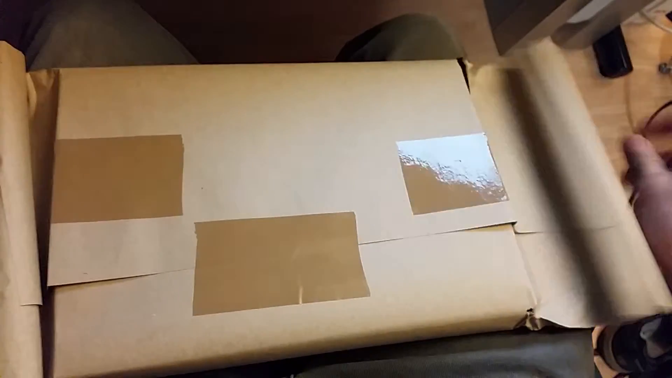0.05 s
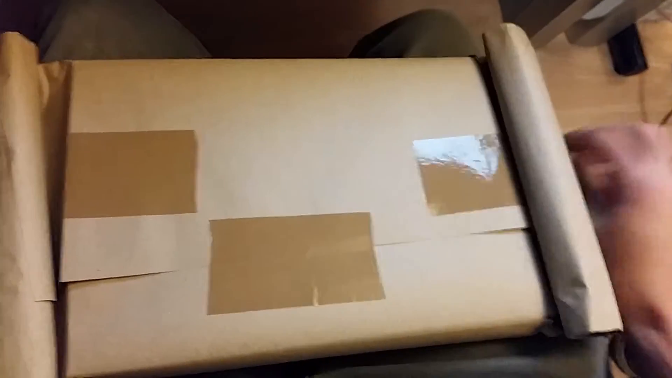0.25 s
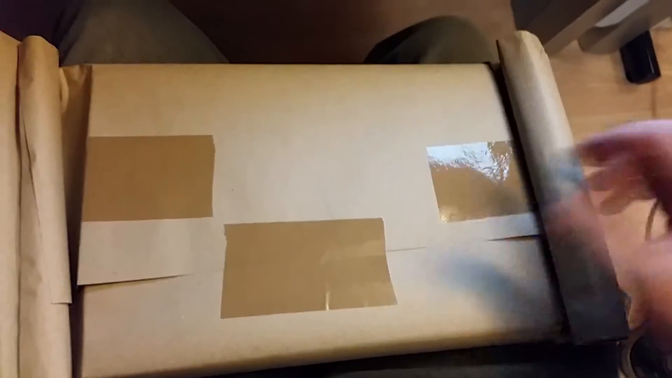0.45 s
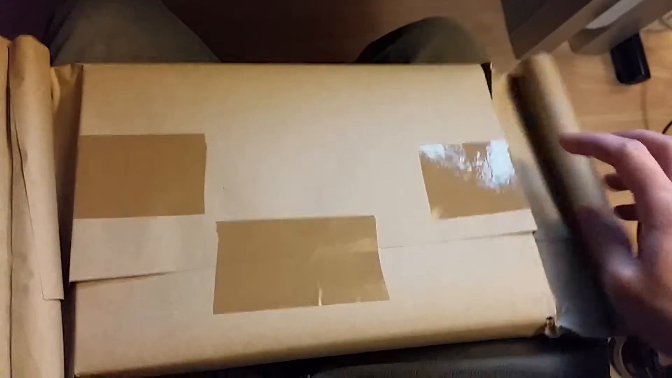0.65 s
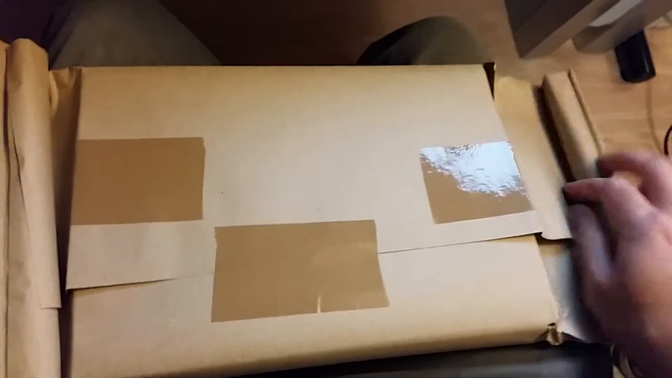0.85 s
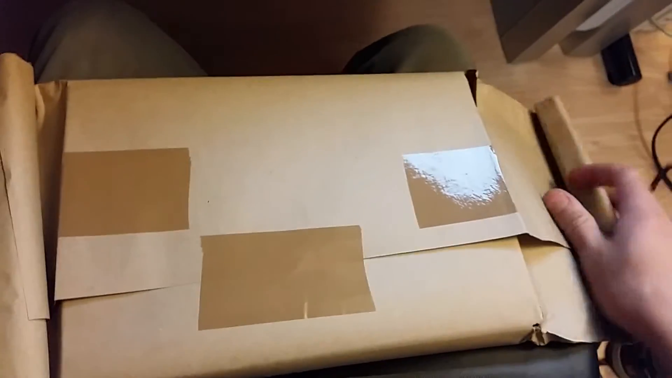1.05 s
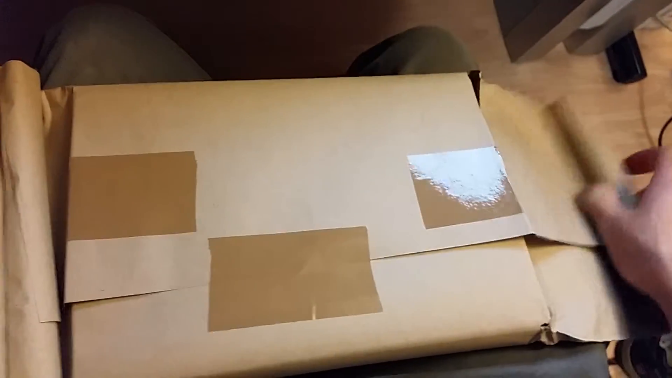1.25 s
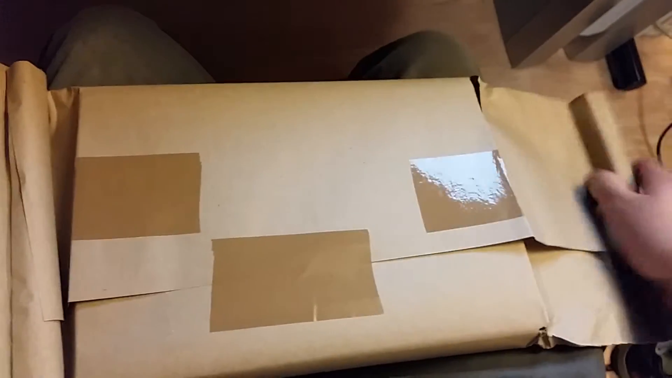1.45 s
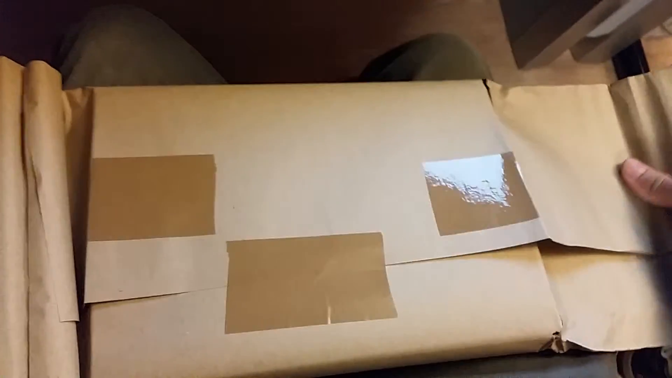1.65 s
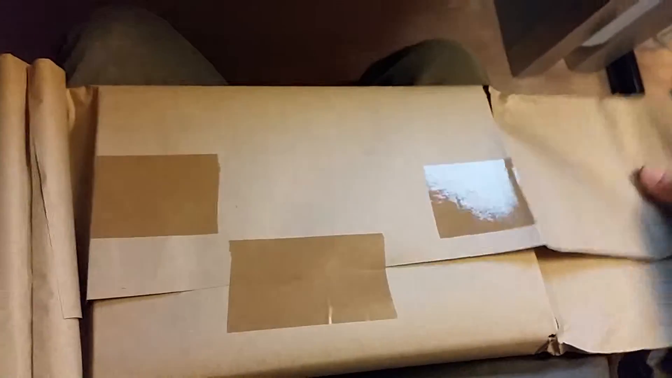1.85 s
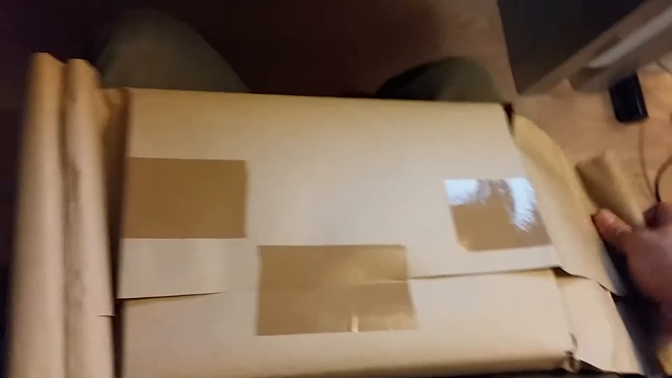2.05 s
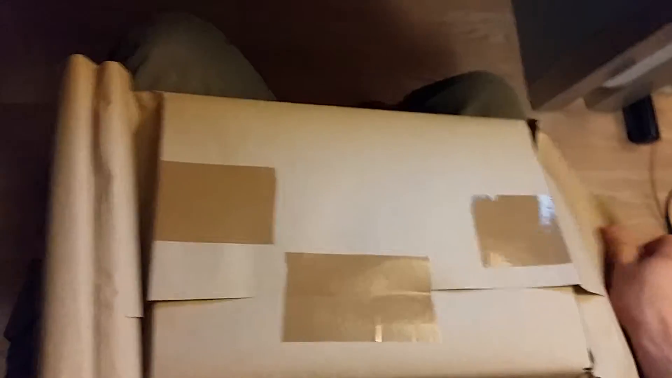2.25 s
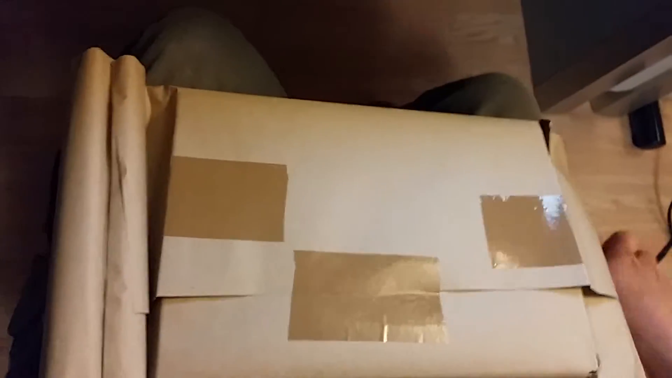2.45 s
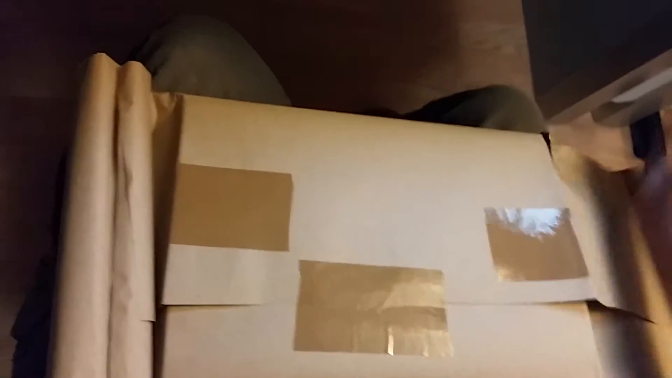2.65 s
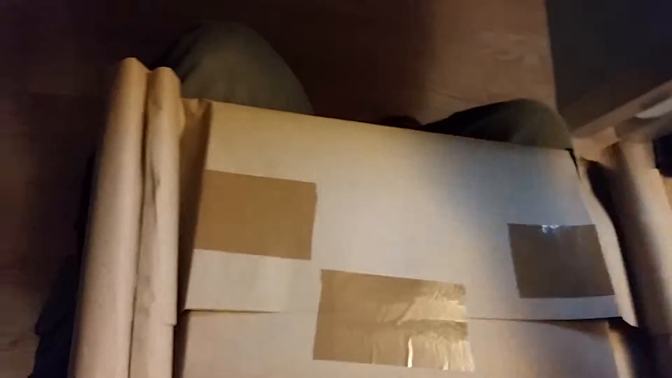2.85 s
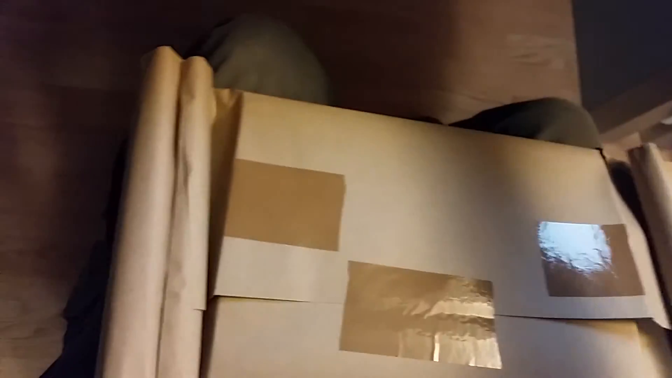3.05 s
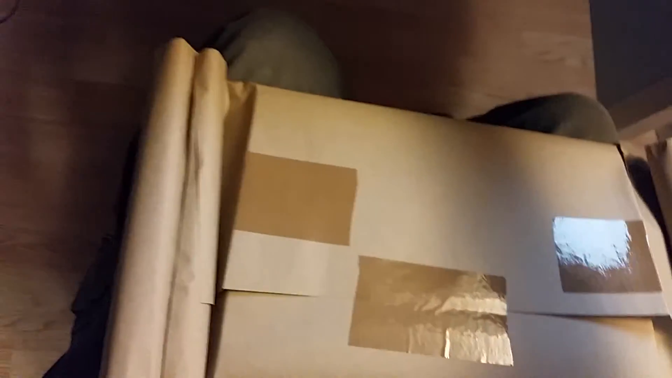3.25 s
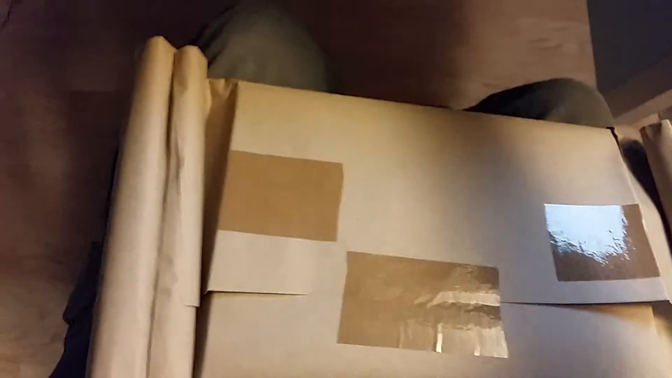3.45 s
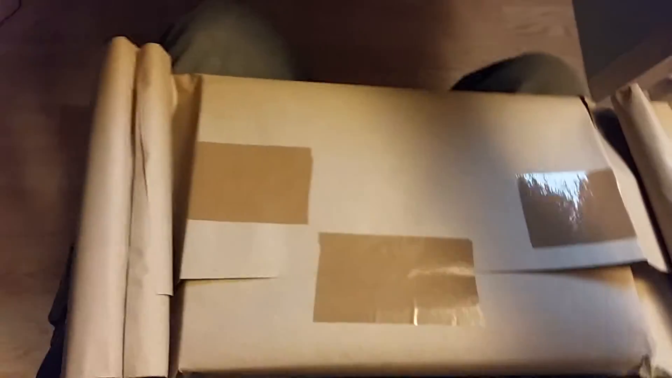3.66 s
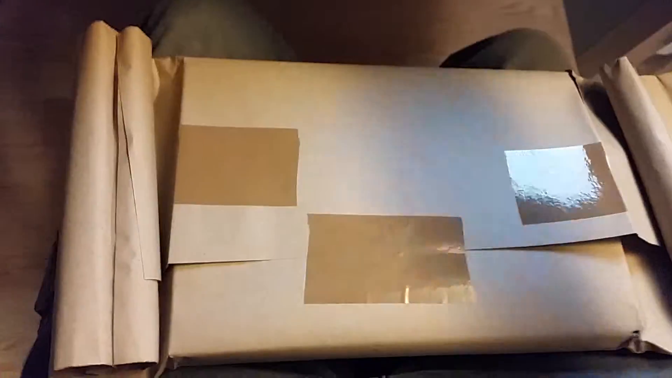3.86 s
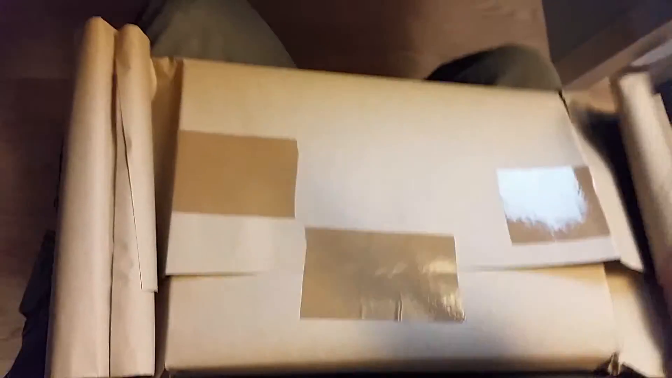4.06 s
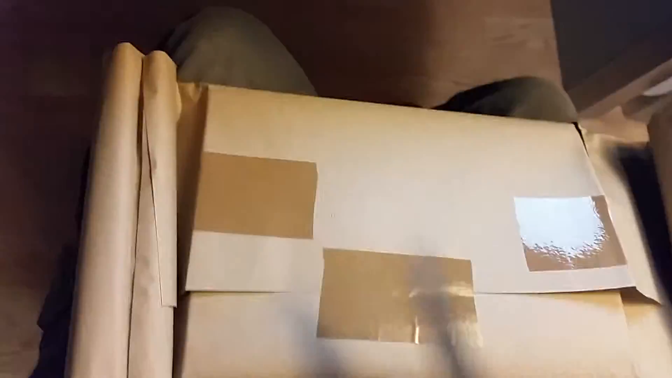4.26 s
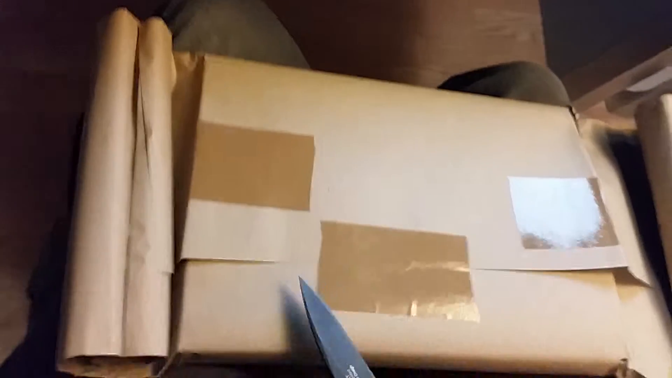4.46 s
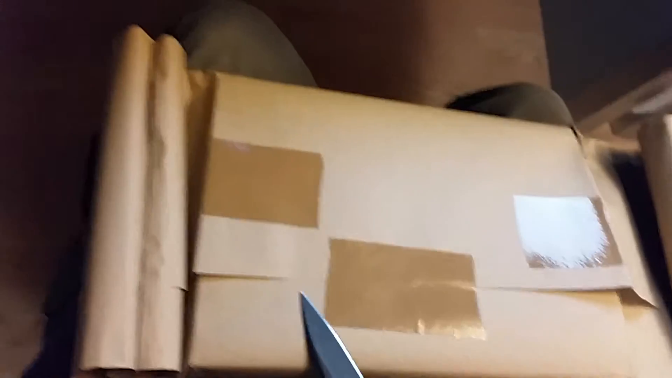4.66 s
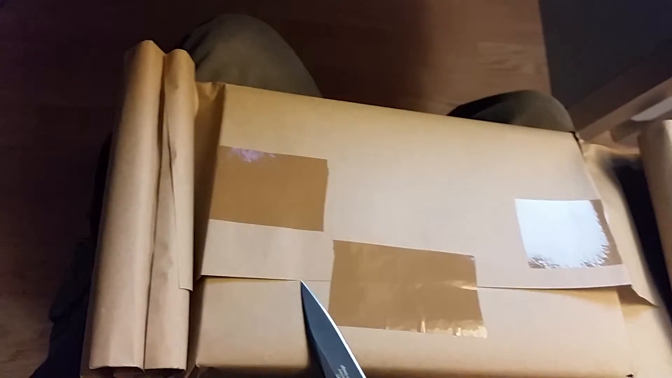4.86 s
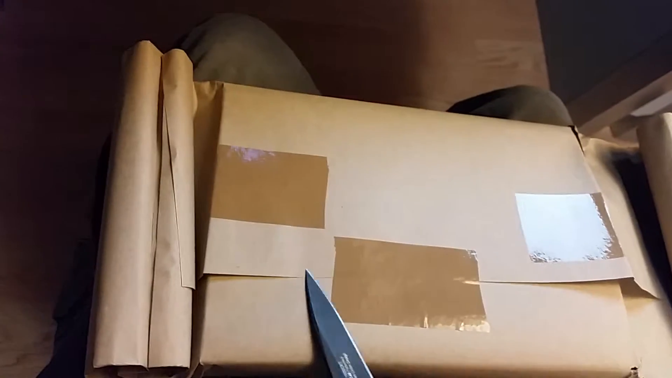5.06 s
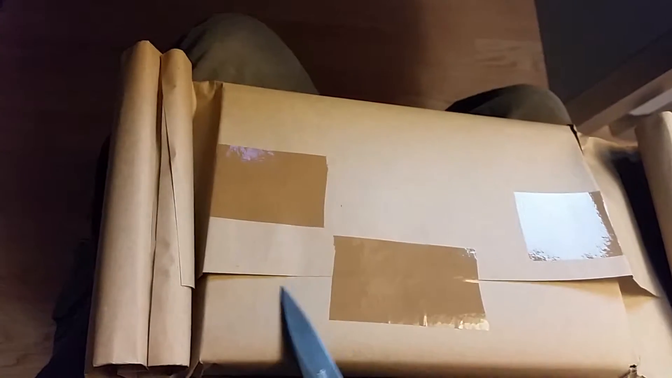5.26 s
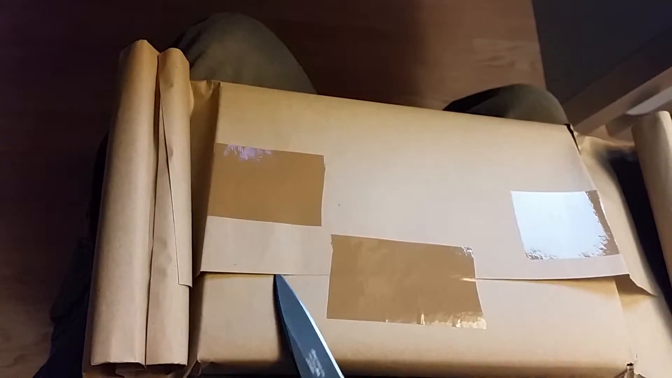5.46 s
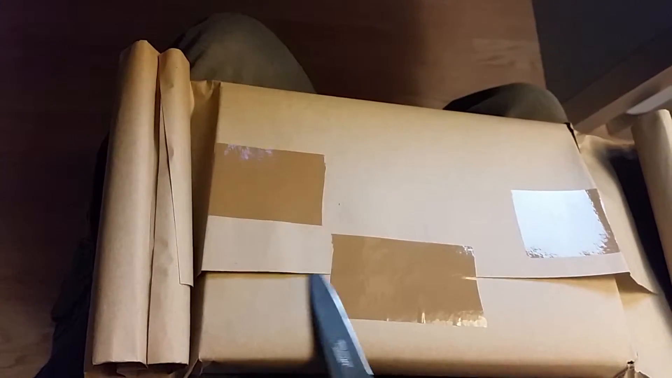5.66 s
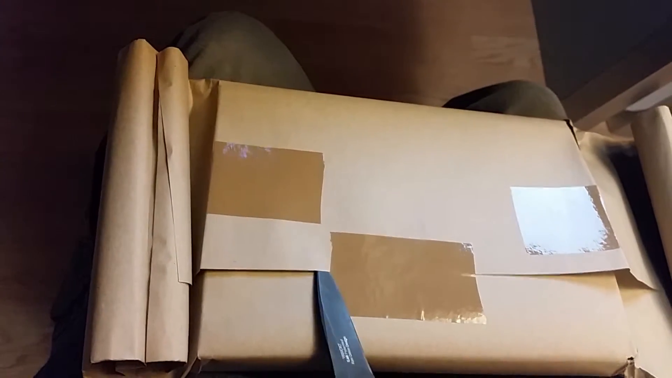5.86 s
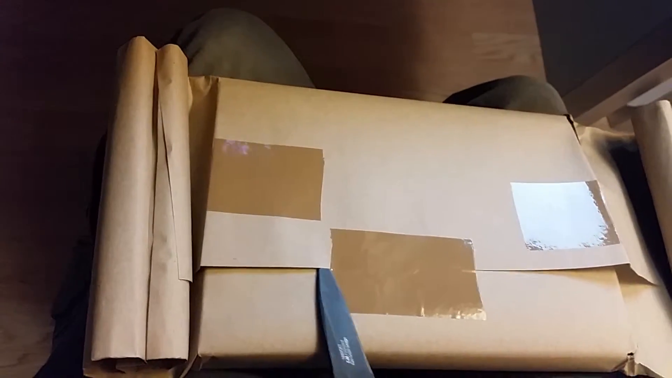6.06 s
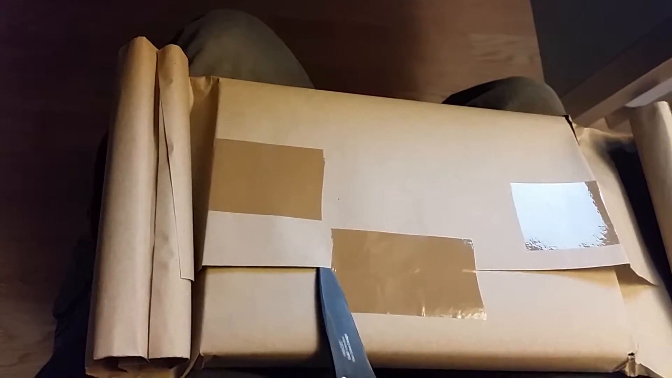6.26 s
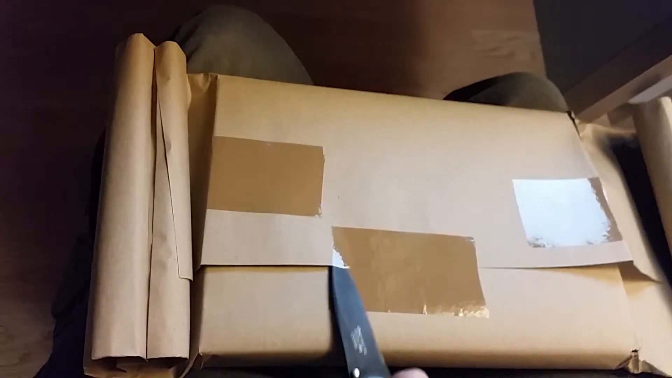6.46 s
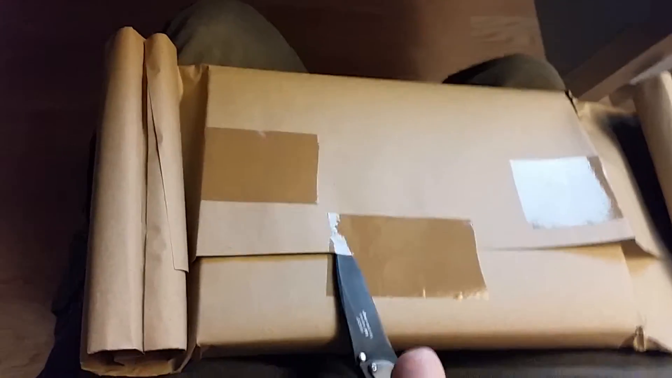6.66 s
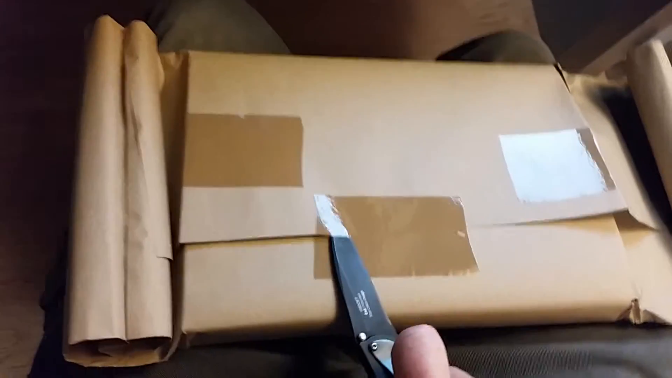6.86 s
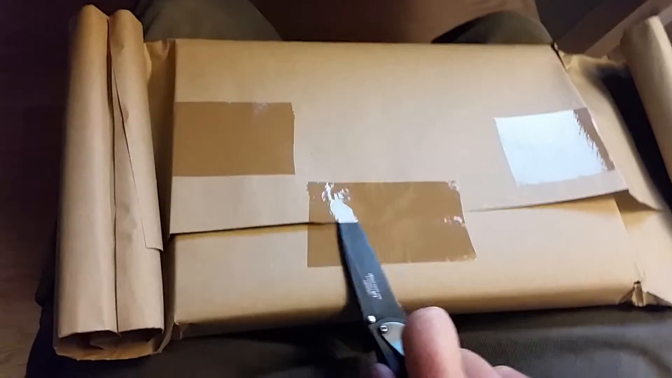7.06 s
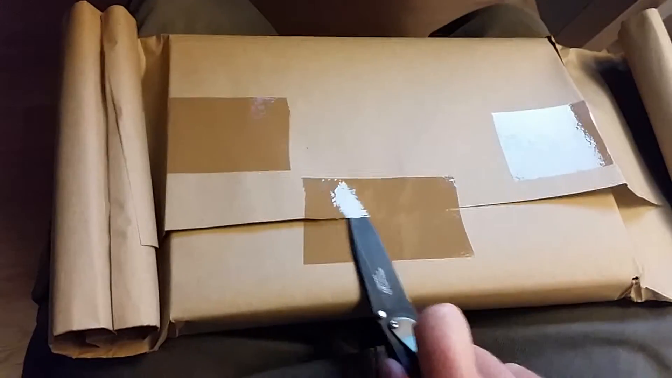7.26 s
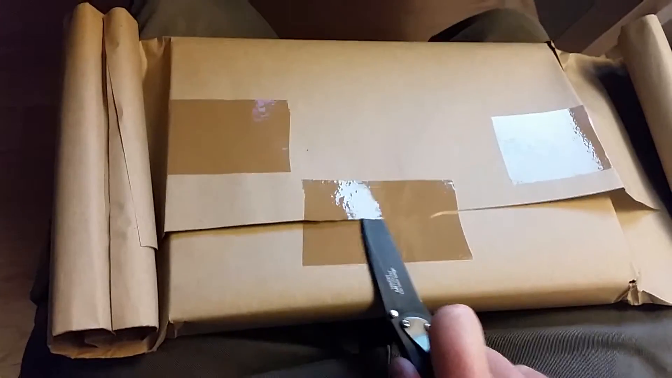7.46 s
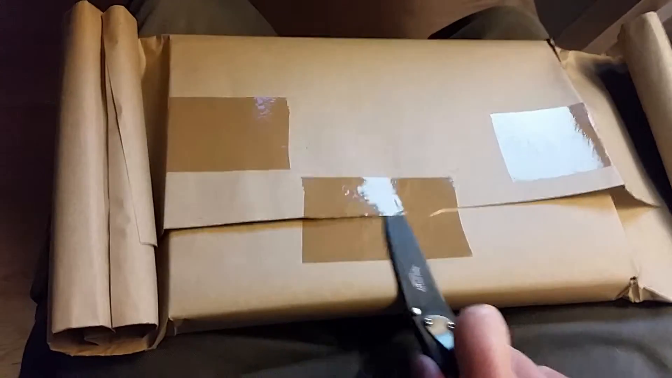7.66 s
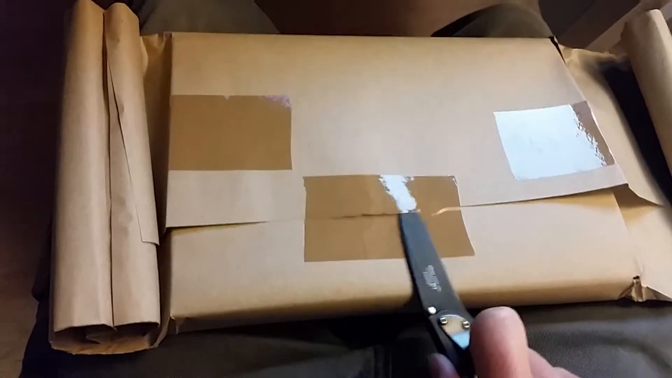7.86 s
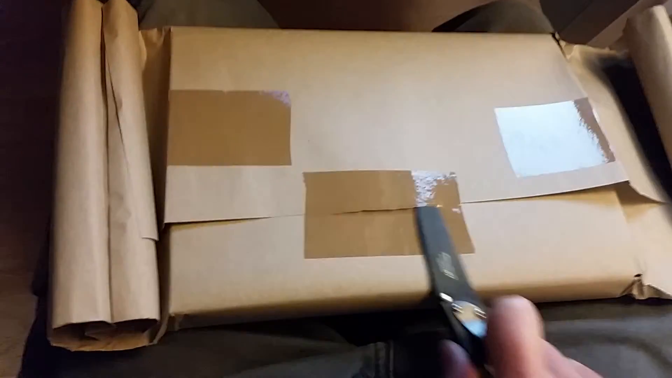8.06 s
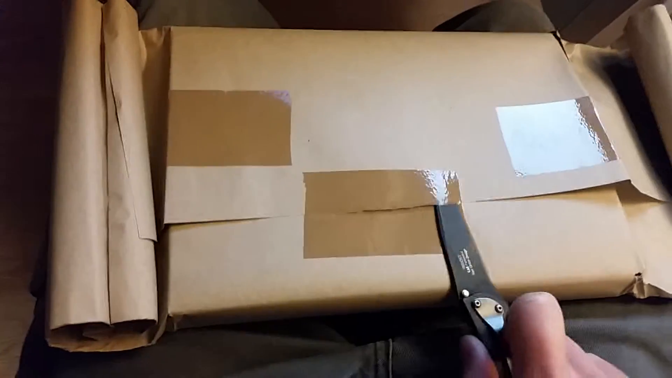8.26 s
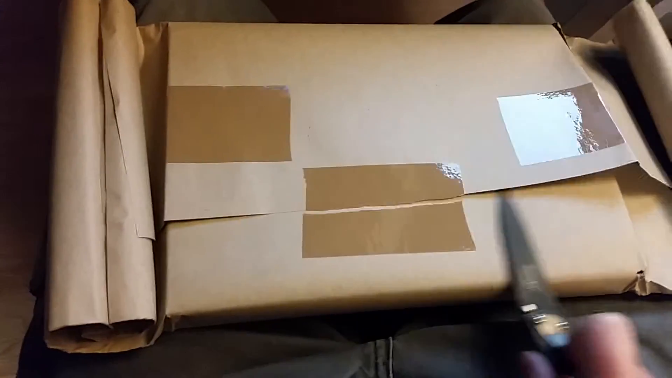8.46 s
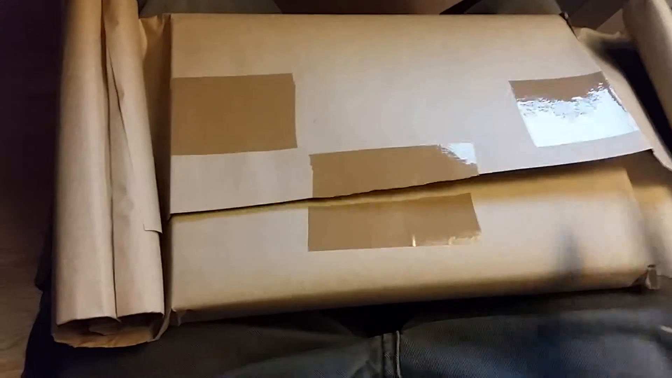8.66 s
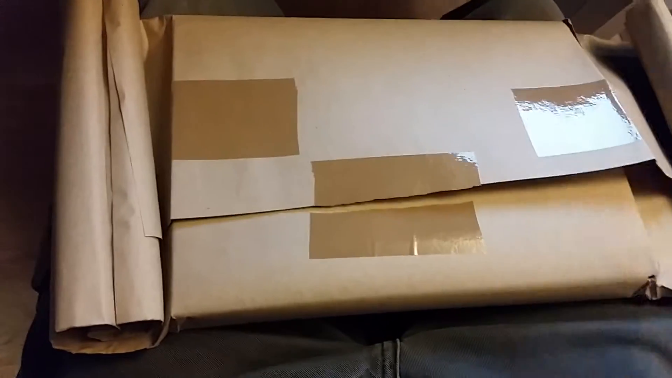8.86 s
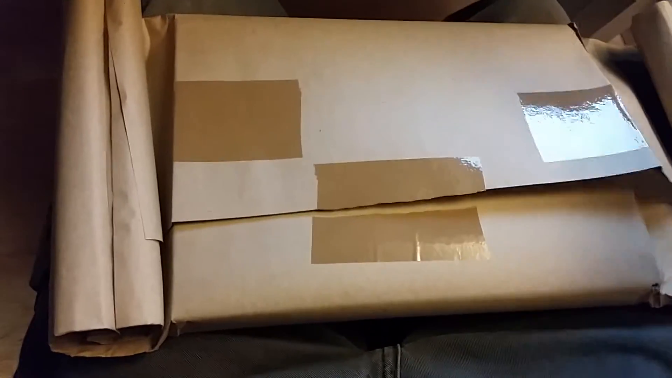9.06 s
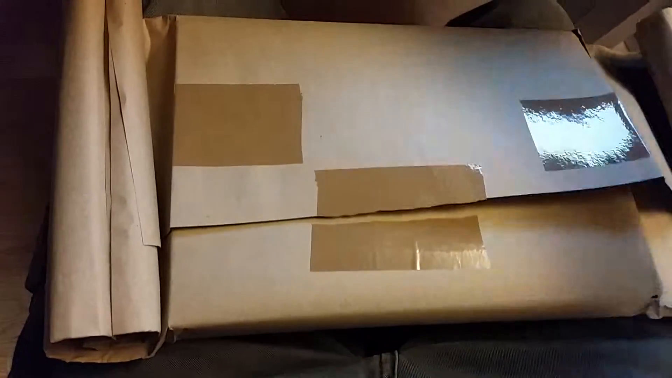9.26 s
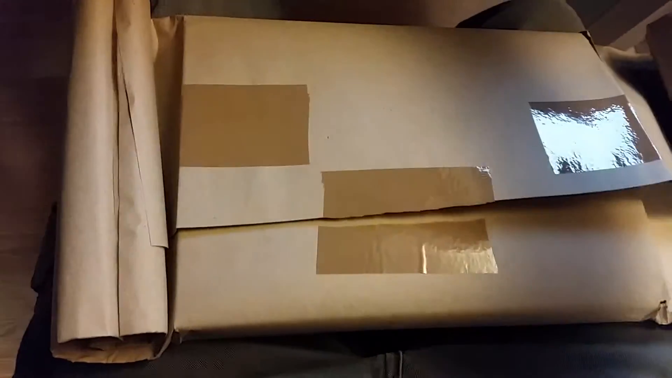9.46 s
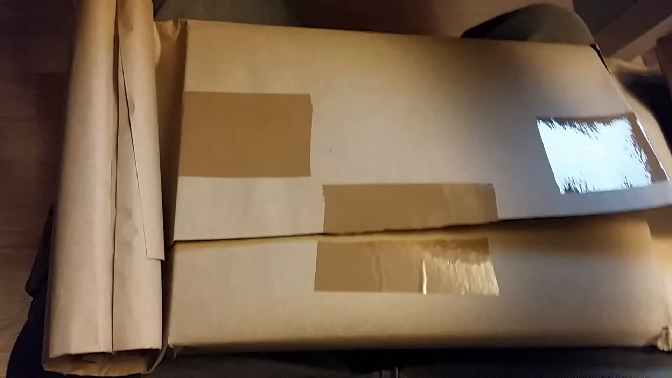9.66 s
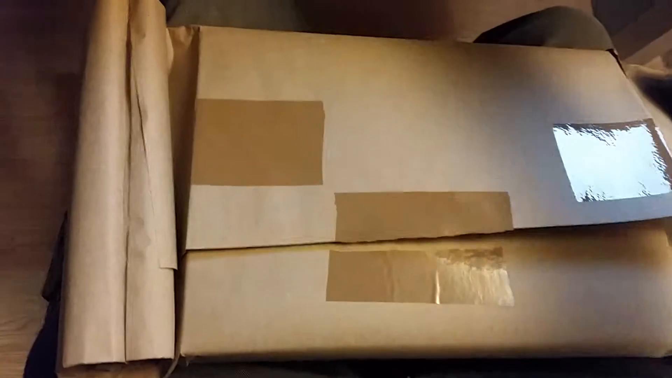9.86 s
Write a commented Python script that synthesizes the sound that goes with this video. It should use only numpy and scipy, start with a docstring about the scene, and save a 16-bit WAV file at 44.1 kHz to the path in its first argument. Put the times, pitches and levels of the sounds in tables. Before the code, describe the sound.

In a quiet, faintly humming room, a paper-wrapped parcel is opened close to a hand-held microphone. First come loud, dry crinkles and crease snaps, then a soft rub across a lap with light hollow knocks. After a lull with faint knife scratches on paper, a run of short rasping cuts tears through tape, building to a final rip. A brief rustle ends it, with occasional dull handling thumps throughout.

```python
"""Stiff paper crackles as a parcel's end is unrolled, the parcel drags over a lap, a knife saws its taped seam.
Paper, cloth and the sliding knife tip rub as noise grains over smooth friction; creases snap, sheet edges
scrape, hollow taps and cardboard squeaks ring. Each knife stroke tears tape fibres in a rough hiss.
A hand-held phone hears it through two ports of unlike colour; the grip bumps it; a quiet room hums behind."""
import sys
import numpy as np
from scipy import signal
from scipy.fft import rfft, irfft, next_fast_len
from scipy.io import wavfile

SR = 44100
rng = np.random.default_rng(int(sys.argv[2]) if len(sys.argv) > 2 else 0)


def file_out(sig):
    """Save sig as 16-bit WAV at sys.argv[1]."""
    # one column per channel
    cols = np.atleast_2d(sig).T
    # limit, then scale
    lim = np.clip(cols, -1, 1)
    pcm = np.round(lim * 32767).astype(np.int16)
    wavfile.write(sys.argv[1], SR, pcm)


N = 437031
T = np.arange(N) / SR
FFT_SIZE = next_fast_len(N + SR // 4)
BIN_HZ = np.maximum(np.arange(FFT_SIZE // 2 + 1) * SR / FFT_SIZE, 1)


def from_db(db):
    """dB to gain."""
    return np.exp(np.asarray(db) * (np.log(10) / 20))


def unit_rms(x):
    """Scale to unit rms."""
    return x / np.sqrt(np.mean(x ** 2) + 1e-20)


def at_bins(points):
    """(Hz, value) points interpolated at every FFT bin."""
    hz, values = np.transpose(points)
    return np.interp(np.log(BIN_HZ), np.log(hz), values)


def colour(x, gain_db):
    """Minimum-phase filter with the given gain per bin."""
    cepstrum = irfft(np.log(from_db(gain_db)), FFT_SIZE)
    cepstrum[1:FFT_SIZE // 2] *= 2
    cepstrum[FFT_SIZE // 2 + 1:] = 0
    return irfft(rfft(x, FFT_SIZE) * np.exp(rfft(cepstrum)), FFT_SIZE)[..., :N]


def band(x, low_hz, high_hz):
    """Butterworth band-pass."""
    sos = signal.butter(2, [low_hz, min(high_hz, .45 * SR)], "band", fs=SR, output="sos")
    return signal.sosfilt(sos, x)


def lift(x, hz, width_hz, gain):
    """Signal plus one resonance of it."""
    return x + gain * signal.lfilter(*signal.iirpeak(hz, hz / width_hz, SR), x)


def ring(times_s, levels_db, hz, t60_s):
    """One damped mode struck at the given times."""
    clicks = np.full(N, 1e-18)
    clicks[(np.asarray(times_s) * SR).astype(int)] = from_db(levels_db)
    r, w = from_db(-60 / (t60_s * SR)), 2 * np.pi * hz / SR
    return signal.lfilter([0, np.sin(w)], [1, -2 * r * np.cos(w), r * r], clicks)


def drift(rate_hz):
    """Slow random wander, unit rms."""
    hop, settle = 40, 2000
    r = np.exp(-2 * np.pi * rate_hz * hop / SR)
    slow = signal.lfilter([1], [1, -2 * r, r * r], rng.standard_normal(N // hop + settle + 2))[settle:]
    return np.interp(np.arange(N) / hop, np.arange(len(slow)), unit_rms(slow))


def port_noise():
    """White noise at both ports: most alike in the low mids, barely in the treble, later on the left."""
    # left-right likeness: (frequency [Hz], coherence [0..1])
    likeness = [(30, .4), (100, .5), (220, .96), (500, .95), (1000, .88), (2000, .7), (4000, .5),
                (16000, .2)]
    left_lag_s = 0.00017
    right, other = rfft(rng.standard_normal((2, FFT_SIZE)))
    alike = at_bins(likeness)
    left = (alike * right + np.sqrt(1 - alike ** 2) * other) * np.exp(-2j * np.pi * BIN_HZ * left_lag_s)
    return irfft(np.array([left, right]), FFT_SIZE)[:, :N]


def grains(per_s, spread_db, t60_s, max_spreads=3.2):
    """Unit-rms envelope of randomly timed, decaying grains of uneven size."""
    born = rng.random(N) < per_s / SR
    sizes = born * from_db(spread_db * np.minimum(rng.exponential(1, N), max_spreads))
    return unit_rms(signal.lfilter([1], [1, -from_db(-60 / (t60_s * SR))], sizes))


def moves(rows, attack_db_s, release_db_s, boom_db, boom_slope=0, usual_db=0):
    """Moves rise, swell or sag, then die; returns level, boom, treble and crispness [dB] per sample."""
    start_s, length_s, db, swell_db, *tints_db = np.transpose(rows)[:, :, None]
    grid_s = T[::64]
    t = grid_s - start_s
    held_db = db + swell_db * (np.clip(t / length_s, 0, 1) - .5)
    fade_db = attack_db_s * np.minimum(t, 0) - release_db_s * np.maximum(t - length_s, 0)
    power = from_db(2 * np.maximum(held_db + fade_db, -200))
    total = power.sum(axis=0)
    level_db = 10 * np.log10(total)
    treble_db, crisp_db, extra_db = [(power * tint).sum(axis=0) / total for tint in tints_db]
    boom_db = boom_db + boom_slope * (level_db - usual_db) + extra_db
    return [np.interp(T, grid_s, curve) for curve in (level_db, boom_db, treble_db, crisp_db)]


def rub(curves, spectrum_db, edges_hz, per_s, spread_db, t60_s, smooth_db, clump_db, flicker_db):
    """Clumped noise grains over smooth friction; four bands follow the curves, each flickering alone."""
    level_db, boom_db, treble_db, crisp_db = curves
    grit = grains(per_s * from_db(clump_db * drift(25)), spread_db, t60_s)
    friction = colour(port_noise() * (grit + from_db(smooth_db)), spectrum_db)
    bands_db = (boom_db, -3 - crisp_db / 2, -3 + crisp_db / 2, treble_db)
    out = 0
    for low_hz, high_hz, db in zip(edges_hz, edges_hz[1:], bands_db):
        gain = from_db(level_db + np.clip(db, -40, 20) + flicker_db * drift(16))
        out = gain * unit_rms(band(friction, low_hz, high_hz)) - out   # alternate signs join in phase
    return out


def crease_snaps(noise):
    """A crease flips: a sharp crack, a broad ring of the sheet, a boom and a treble tick."""
    # snaps: (time [s], body peak [dB], pitch [Hz], tick re body [dB], t60 [s])
    snaps = [(.019, -15, 4570, -31, .054), (0.029, -17, 3670, -29, 0.025), (0.053, -11.5, 3660, -27, .026),
             (.083, -9, 2780, -2, 0.045), (.111, -8, 5600, -22, 0.057), (.144, -15.5, 1550, 13, 0.019),
             (.201, -8, 2180, -38, 0.017), (.235, -12, 1080, 16, 0.021), (0.371, -41.5, 930, -11, 0.051),
             (.382, -36.5, 6000, 4, 0.034), (.588, -52.5, 5000, 6, .05), (.626, -16, 900, -2, 0.039),
             (0.674, -15, 1830, -18, 0.1), (.707, -13.5, 2510, -10, 0.029), (.748, -18, 2500, -10, 0.017),
             (0.765, -17.5, 3010, -22, 0.017), (.782, -28, 2150, 7, .023), (.797, -25, 3000, -15, .012),
             (.811, -21.5, 1380, -15, 0.024), (.861, -20, 1200, -15, .015), (.877, -16, 4350, -27, 0.01),
             (0.888, -14, 5250, -32, 0.027), (.947, -16, 1340, -21, 0.031), (.968, -27, 3020, -3, 0.018),
             (1.096, -19.5, 1980, -26, 0.019), (1.166, -26.5, 6030, -9, 0.023),
             (1.378, -10, 3800, -26, 0.016), (1.387, -17.5, 5850, -26, .026),
             (1.392, -11, 1960, -34, 0.037), (1.466, -18, 7970, -14, 0.018), (1.473, -22, 2970, 2, 0.025),
             (1.481, -18.5, 7800, 9, .015), (1.506, -7.5, 6200, -12, 0.0079),
             (1.682, -17, 1950, -17, 0.033), (1.701, -16, 3660, -10, 0.02), (1.754, -10, 3000, 8, 0.025),
             (1.76, -7.5, 3300, -1, .011), (1.846, -15, 3350, 11, 0.021), (1.909, -9.5, 1800, -18, 0.028),
             (1.925, -2.5, 3580, 1, 0.0088), (1.931, -15, 6000, -19, .015), (1.966, -14.5, 2240, 11, 0.025),
             (2.041, -12.5, 3300, -22, 0.022), (2.057, -15, 3080, -33, 0.016),
             (2.076, -15.5, 2220, -27, 0.037), (2.112, -9.5, 2900, -6, 0.019), (2.162, -13, 4200, 3, .026),
             (2.255, -18, 2560, -12, 0.022), (2.26, -14.5, 1830, 7, 0.055),
             (2.271, -16.5, 2520, -15, 0.028), (2.296, -16.5, 4610, 11, 0.035),
             (2.311, -26, 7900, 21.5, 0.0097), (2.319, -19.5, 7970, 15, 0.065),
             (2.415, -34.5, 3200, -19, 0.073), (2.515, -21, 2060, 15.5, 0.017),
             (2.531, -28, 3800, 20.5, 0.036), (2.575, -55, 7970, -6, .018), (2.646, -34, 1610, -23, 0.024),
             (2.7, -28, 3160, -23, 0.036), (2.758, -21, 4800, -1, 0.044), (2.789, -21, 3940, -2, 0.035),
             (2.809, -26.5, 1740, -25, 0.036), (2.887, -34.5, 1660, -29, 0.017),
             (2.906, -40.5, 1590, -35, 0.025), (2.938, -47, 1340, -27, .018),
             (2.991, -20.5, 3300, -7, 0.033), (3, -29.5, 1810, -16, .015),
             (3.158, -29.5, 1720, -32.5, 0.039), (3.24, -39.5, 1680, -32, 0.023),
             (3.286, -40, 7000, 9, 0.068), (3.302, -46, 6000, 8, .03), (3.35, -41.5, 900, 7, 0.028),
             (3.384, -35.5, 1950, -6, .044), (3.432, -42.5, 1810, -30, 0.048), (3.493, -37, 900, -1, 0.016),
             (3.514, -43, 900, -14, 0.021), (3.724, -43, 7470, 4, .024), (3.991, -17, 3600, -1, .054),
             (4.143, -39, 1910, 0, .016), (4.243, -22.5, 2840, 9.5, 0.048), (4.263, -15, 2500, -6, 0.066),
             (4.401, -40, 1740, -26, .021), (4.52, -50, 1585, -33.5, .02), (4.674, -43.5, 6000, -7, .018),
             (6.186, -54.5, 4420, -12, .02), (6.442, -42.5, 7050, -11, 0.026), (6.85, -34, 6000, -15, .008),
             (6.863, -39, 6500, -12, 0.0067), (6.941, -38, 5000, -15, .008), (7.279, -53, 6500, -15, .008),
             (7.884, -30.5, 6500, -15, .01), (8.314, -31, 7000, -8, 0.014), (8.322, -33, 5000, -12, 0.015),
             (8.347, -23.5, 7110, -2, 0.0094), (8.486, -13.5, 7000, 0, 0.1), (8.658, -34, 4500, 2, 0.032),
             (9.395, -65, 7000, 0, 0.014), (9.66, -45, 3830, 16.5, .022), (9.802, -38.5, 6800, -1, 0.13),
             (9.843, -24.5, 7600, -8, 0.043)]
    crack_t60_s, max_boom_db = .0035, -55
    out = np.zeros((2, N))
    for time_s, peak_db, hz, tick_db, t60_s in snaps:
        i = int(time_s * SR)
        t = np.arange(min(int(.12 * SR), N - i)) / SR
        span = slice(i, i + len(t))
        decay = from_db(-60 * t / t60_s) + 2.2 * from_db(-60 * t / crack_t60_s)
        puff = noise[:, span] * decay
        body = band(puff, max(700, .26 * hz), np.clip(2.6 * hz, 5000, 9500))
        body = lift(body, hz, width_hz=.5 * hz, gain=1.8)
        boom = band(noise[:, span] * np.sqrt(decay), 67, 1400)
        tick = band(puff, 14000, 21000)
        boom_db = min(max_boom_db, peak_db - 14)
        for part, db in ((-body, peak_db), (boom, boom_db), (tick, peak_db + tick_db)):
            out[:, span] += from_db(db) * part / np.abs(part).max(axis=1, keepdims=True)
    return out


def paper_rustle():
    """Pulls on the rolled paper shed short, dry crinkles."""
    # pulls: (start [s], length [s], level [dB], swell [dB], treble [dB], crispness [dB], boom [dB])
    pulls = [(.02, 0.046, -35.5, -7.5, -4.5, 15.5, -1.5), (.11, 0.043, -30, 0, 0.5, -1, -1),
             (.19, 0.065, -41.5, 8, -10, 2.5, 0), (.36, 0.072, -66, -5.5, 3, 15, 0),
             (.615, 0.11, -41.5, 10, 5.5, 8, -2), (.715, 0.046, -35.5, -5, -1, -4, -1),
             (.78, 0.044, -48.5, 7, -16, 0, 1), (.845, 0.13, -39, -9.5, -3, 4, -5),
             (1.02, 0.14, -40.5, -0.5, 4, 5, -1.5), (1.205, 0.036, -39.5, 1, 8.5, 8, -1.5),
             (1.3, 0.091, -51.5, -7, 16.5, 2, -6), (1.385, .02, -41, -6, 2, 4.5, 4),
             (1.465, 0.042, -45.5, 1, 11, -11, 1), (1.55, 0.12, -42.5, 13.5, 7, 3, -5),
             (1.7, 0.062, -37, 1.5, -1.5, -3.5, -5), (1.82, 0.067, -47.5, 0.5, 10.5, -1, -7.5),
             (1.915, 0.038, -34.5, 0, 7, -1.5, -4), (2.0, 0.042, -47, -0.5, 3, -6, 9),
             (2.05, 0.031, -50.5, 8, -7, -4, 1.5), (2.11, 0.11, -42, -3.5, 0.5, 8, -3.5),
             (2.257, 0.073, -40, -7, 8, 6, 0.5), (2.38, 0.13, -62.5, -7, -0.5, -9, -2),
             (2.52, 0.13, -54, 4.5, 5.5, 13, -1), (2.69, 0.021, -52, -4, -7, 10, -3),
             (2.76, .02, -58, -12, -10, 10, 3), (2.79, 0.015, -57, 1, 0, -5, -5),
             (2.885, 0.031, -72.5, -11, -19, -29, 8), (2.995, 0.0055, -66.5, -11, -3.5, -8, 7)]
    # paper spectrum: (frequency [Hz], density [dB])
    spectrum = [(35, -34), (60, -10.5), (187, -2.5), (266, -8), (443, -5), (559, -12), (829, -14.5),
                (1070, -6), (1960, 2), (5980, -4), (6870, -4), (8280, -1), (9970, -13), (13500, 2.5),
                (15500, 1)]
    curves = moves(pulls, attack_db_s=798.5, release_db_s=301, boom_db=-5, boom_slope=-.21, usual_db=-44.5)
    return rub(curves, at_bins(spectrum), (45, 700, 3000, 9500, SR),
               per_s=270, spread_db=8.5, t60_s=.006, smooth_db=3.5, clump_db=4.5, flicker_db=5)


def edge_scrapes(noise):
    """Sheet edge on sheet: a rounded swell of noise in one broad resonance."""
    # scrapes: (start [s], length [s], level [dB], pitch [Hz])
    scrapes = [(0.677, 0.076, -40, 2620), (1.923, 0.042, -29, 2800), (2.085, .06, -32.5, 2670),
               (2.168, 0.051, -32.5, 3000)]
    out = np.zeros((2, N))
    for start_s, length_s, db, hz in scrapes:
        a, b = int(start_s * SR), int((start_s + length_s) * SR)
        rasp = unit_rms(band(noise[:, a:b], .75 * hz, 1.25 * hz))
        out[:, a:b] += from_db(db) * rasp * np.sqrt(np.hanning(b - a))
    return out


def knife_cuts():
    """Each push tears tape fibres: rough hiss whose broad peak climbs as the uncut tape shortens."""
    # strokes: (start [s], end [s], level [dB], relative treble [dB])
    strokes = [(6.369, 6.455, -53, -4), (6.474, 6.56, -48.5, -5), (6.567, 6.668, -47.5, -5),
               (6.692, 6.783, -52.5, -10), (6.823, 6.887, -43.5, -11), (6.907, 7.0, -48, -10),
               (7.033, 7.111, -46.5, -9), (7.128, 7.207, -45.5, -10), (7.245, 7.314, -43.5, -16),
               (7.334, 7.409, -44, -8), (7.43, 7.508, -41.5, -9), (7.534, 7.62, -44.5, -10),
               (7.635, 7.723, -43.5, -5), (7.719, 7.818, -39.5, -5.5), (7.828, 7.918, -44.5, -11),
               (7.928, 8.026, -44, -13), (8.021, 8.121, -37, -9), (8.144, 8.295, -39, -8),
               (8.287, 8.361, -38, -8), (8.392, 8.476, -35.5, -12), (8.468, 8.633, -31.5, -1),
               (8.669, 8.694, -27.5, -11)]
    # tearing tape without its moving peak: (frequency [Hz], density [dB])
    spectrum = [(300, -25), (500, -24.5), (1000, -17.5), (1700, -21.5), (2500, -13.5), (3300, -13),
                (5000, -10), (8000, -10.5), (10000, -15), (12000, -10.5), (14500, 0), (16000, -6)]
    first_hz, climb_hz_s, exit_hz = 5720, 1040, 4400
    bite_s, let_go_s, peak_share, rest_db = .021, .013, .37, -19.5
    fibres = grains(per_s=2500, spread_db=11, t60_s=.011, max_spreads=3.3)
    hiss = colour(port_noise() * (fibres + 2.5), at_bins(spectrum))
    hiss = unit_rms(hiss) * from_db(.81 * drift(27))
    out = np.zeros((2, N))
    for start_s, end_s, db, treble_db in strokes:
        hz = first_hz + climb_hz_s * (start_s - strokes[0][0])
        if start_s == strokes[-1][0]:   # the last stroke slips off the tape
            hz = exit_hz
        a, b = int((start_s - bite_s) * SR), int((end_s + let_go_s) * SR)
        peak_s = start_s + peak_share * (end_s - start_s)
        knots_s = [start_s - bite_s, start_s + .009, peak_s, end_s - .01, end_s + let_go_s]
        push_db = np.interp(T[a:b], knots_s, [-40, -4, 0, -4, -44])
        if start_s < strokes[-3][0]:   # the blade still rubs between pushes
            push_db = np.maximum(push_db, rest_db)
        tear = lift(band(hiss[:, a:b], 283, 7330), hz, width_hz=.22 * hz, gain=2.3)
        treble = from_db(treble_db) * band(hiss[:, a:b], 8700, SR)
        out[:, a:b] += from_db(db + push_db) * (tear - treble)
    return out


def tip_slides():
    """Knife tip and fingers slide on paper: fine hiss coloured by the blade's resonances."""
    # slides: (start [s], length [s], level [dB], swell [dB], treble [dB], crispness [dB], boom [dB])
    slides = [(4.67, 0.064, -76, 2, -7, 0, -2), (4.68, 1.66, -81.5, 0, -9, 0.5, -3),
              (4.79, 0.061, -69.5, -3, 0, 6, -3), (4.89, 0.038, -68.5, -3, -17, 6, 0),
              (5.01, .04, -67, -6, -16, -4, -3), (5.135, 0.037, -77.5, 0.5, -11.5, 0, -3),
              (5.22, .05, -69, 4.5, -10, -8, 0), (5.27, 0.11, -58, -1, -11, -4, -4.5),
              (5.46, .11, -64.5, 0, -12, 4, -5), (5.61, 0.13, -62.5, 8, -18, 3, -4),
              (5.7, 0.13, -56, 1, -14, 9, 1), (5.87, 0.091, -74.5, 8, -6, -2, 6),
              (6.05, 0.036, -68.5, -1, -11.5, -4.5, -1), (6.18, .04, -72.5, -5.5, -12, -6, -5.5),
              (8.73, 0.14, -75.5, -4, 3, 1, 6.5), (9.0, 0.33, -91, -2, 18, 0, -1),
              (9.35, 0.05, -79, 0.5, 19.5, -5, 2), (9.42, 0.18, -80.5, 1, 8, -2, -1),
              (9.66, 0.031, -75, 1, 5, -4, -9.5), (9.69, 0.065, -82, -3, 4, 1, -2)]
    # tip friction spectrum: (frequency [Hz], density [dB])
    spectrum = [(350, -67), (600, -35.5), (716, -5.5), (1410, -12.5), (1860, -20), (2160, -7),
                (2950, -15.5), (3920, -15), (5980, 0.5), (9240, -2.5), (10700, -7), (14500, 19.5),
                (15500, 24)]
    # blade resonances: (frequency [Hz], width [Hz], lift [dB])
    blade = [(2070, 89, -2.5), (4200, 1150, 14), (6240, 400, -3), (6200, 650, 8), (8520, 500, 7.5),
             (12400, 580, 5), (14040, 460, 7)]
    blade_db = sum(db / (1 + (2 * (BIN_HZ - hz) / width_hz) ** 2) for hz, width_hz, db in blade)
    curves = moves(slides, attack_db_s=600, release_db_s=450, boom_db=-8.5, boom_slope=.15, usual_db=-73.5)
    return rub(curves, at_bins(spectrum) + blade_db, (500, 2500, 5000, 10000, SR),
               per_s=930, spread_db=6, t60_s=.0091, smooth_db=4, clump_db=3, flicker_db=1.5)


def drags_and_flap():
    """The parcel drags on cloth, and near the end a cardboard flap rubs: long, overlapping grains make a dull
    rub."""
    # drags (rows from 9.8 s: the cardboard flap): (start [s], length [s], level [dB], swell [dB], treble [dB],
    # crispness [dB], boom [dB])
    drags = [(3.165, 0.072, -53.5, 12.5, -5, -0.5, -5.5), (3.24, 0.06, -51.5, 5.5, -16, -2.5, -2),
             (3.285, 0.015, -62, -3, 19, 5, -7), (3.355, 0.034, -56.5, 13, 6, -3, -3),
             (3.42, 0.029, -61.5, -7, -8, 1, 7), (3.495, 0.016, -64.5, -12, 19, -8, 0),
             (3.57, 0.017, -66.5, -8, -9, -10, 1), (3.63, .1, -66.5, 1, 16, -2, -10),
             (9.806, .025, -52.5, 0, -4, -0.5, 2.5), (9.835, 0.022, -45, 7, -13, 0, 6),
             (9.87, .04, -59.5, -5, -22, -4, 17)]
    # dull rub spectrum: (frequency [Hz], density [dB])
    spectrum = [(35, -32), (60, -7), (145, -6.5), (259, -3.5), (305, 6), (423, -12.5), (464, -8.5),
                (599, -22), (849, -11), (1170, -18), (1830, -16), (4120, -33), (7900, -22), (11700, -51),
                (15500, -6.5)]
    curves = moves(drags, attack_db_s=900.5, release_db_s=349.5, boom_db=1)
    return rub(curves, at_bins(spectrum), (45, 600, 1500, 4500, SR),
               per_s=970, spread_db=6, t60_s=.031, smooth_db=-20.5, clump_db=2, flicker_db=.6)


def hollow_taps():
    """Each tap rings the modes of a hollow body with random strengths."""
    # taps: (time [s], level [dB])
    taps = [(3.159, -59), (3.353, -48), (3.385, -56), (3.491, -47), (3.512, -37), (3.538, -43),
            (3.576, -47), (3.628, -54), (3.682, -54)]
    # body modes: (frequency [Hz], level [dB], t60 [s])
    modes = [(780, -38, 0.12), (1053, -4, 0.038), (1600, -24, 0.083), (1810, -26, 0.068),
             (2331, -25, 0.063), (2560, -20, 0.074)]
    times_s, taps_db = np.transpose(taps)
    scatter_db = rng.normal(0, 1.3, (len(taps), len(modes)))
    return sum(ring(times_s, taps_db + mode_db + scatter_db[:, k], hz, t60_s)
               for k, (hz, mode_db, t60_s) in enumerate(modes))


def cardboard_squeaks():
    """Two short slips ring one resonance of the cardboard."""
    return ring(times_s=[9.827, 9.837], levels_db=[-32, -35], hz=1914, t60_s=.045)


def grip_bumps():
    """The phone's case takes a quick jolt, then swings slowly for a few cycles."""
    # bumps: (time [s], left jolt [dB], swing re jolt [dB], right re left [dB])
    bumps = [(1.133, -25.5, -31, -1), (1.202, -24, -18, 0), (1.54, -10.5, -9, -19), (1.797, -27.5, -5, -13),
             (2.631, -33, -26, 0), (2.987, -34, 4, -9), (3.003, -33, -4.5, -19), (3.994, -30.5, 9, -8),
             (4.051, -19.5, -6.5, -13), (4.104, -33, 12, -22.5), (4.595, -38, -2.5, -13.5),
             (5.126, -36, -5.5, -15), (5.679, -25.5, -17.5, -28.5), (6.373, -35, -4, -20),
             (6.579, -39, 11, -27), (6.605, -40.5, 14, -21), (6.782, -22, -16.5, -27),
             (7.929, -17.5, -2.5, -18), (8.138, -32, -12, -8), (8.379, -30, -5, -9.5), (9.111, -28, 6, -17),
             (9.171, -15, 1.5, -20), (9.695, -38.5, 12.5, -16.5), (9.831, -24.5, -13.5, -7)]
    jolt_hz, jolt_t60_s, swing_hz, swing_t60_s = 198, .013, 79.5, .035
    out, t = np.zeros((2, N + SR)), np.arange(int(.15 * SR)) / SR
    jolt = np.sin(2 * np.pi * jolt_hz * t) * from_db(-60 * t / jolt_t60_s)
    swing = np.sin(2 * np.pi * swing_hz * t) * from_db(-60 * t / swing_t60_s)
    for time_s, jolt_db, swing_db, right_db in bumps:
        i = int(time_s * SR)
        gains = from_db([[jolt_db], [jolt_db + right_db]])
        out[:, i:i + len(t)] -= gains * (jolt + from_db(swing_db) * swing)
    return band(band(out[:, :N], 66, 770), 30, 700)   # soft hand; the microphone drops the deep bass


def room_echo(x):
    """A short noise tail; its echoes switch at random as hands and parcel move."""
    t60_s, gap_s, hold_s, tail_count = .17, .004, .05, 3
    t = np.arange(int(.24 * SR)) / SR
    active = rng.integers(0, tail_count, 200)[(T / hold_s).astype(int)]
    spectrum = 0
    for k in range(tail_count):
        tail = rng.standard_normal((2, len(t))) * from_db(-60 * t / t60_s) * (t > gap_s)
        tail = unit_rms(band(tail, 200, 16000) + .3 * tail) / np.sqrt(len(t))
        spectrum = spectrum + rfft(x * (active == k), FFT_SIZE) * rfft(tail, FFT_SIZE)
    return irfft(spectrum, FFT_SIZE)[:, :N]


def background():
    """Room tone, fan hiss and a wavering appliance drone sink and swell over the hand's rumble."""
    # level curves: (time [s], room [dB], rumble [dB])
    levels = [(0.0, -63, -51), (0.3, -66, -60), (0.5, -58.5, -76), (1.4, -56, -73), (2.0, -64, -78),
              (2.75, -63.5, -74), (3.05, -69.5, -65), (3.75, -61, -66.5), (4.11, -56.5, -53),
              (4.33, -58.5, -62), (5.0, -60.5, -71.5), (5.63, -57, -77.5), (6.25, -60.5, -87.5),
              (6.6, -57, -66), (8.2, -55.5, -93.5), (8.85, -57, -70), (9.36, -59, -56.5),
              (9.91, -57.5, -74)]
    # room tone spectrum: (frequency [Hz], density [dB])
    spectrum = [(12, -37), (20, -11), (44, -5.5), (85, -5.5), (185, 2), (352, -7.5), (404, -11), (597, -20),
                (1340, -28), (2680, -29.5), (4190, -14.5), (5690, -39), (9660, -50), (14300, -29.5),
                (15500, -35)]
    # drone resonances: (frequency [Hz], width [Hz], level re room [dB])
    hums = [(121, 20, -13), (181.1, 4, -4.5), (238.9, 6.3, -11), (363.2, 3.1, -17.5)]
    times_s, *curves = np.transpose(levels)
    room_db, rumble_db = [np.interp(T, times_s, curve) for curve in curves]
    noise = port_noise()
    tone = colour(noise, at_bins(spectrum))
    tone = from_db(-10.5) * tone / np.std(band(tone, 3500, 4900))
    fan = from_db(-16.5) * unit_rms(band(band(port_noise(), 3400, 4600), 3400, 4600))
    drone = sum(from_db(db) * unit_rms(band(noise, hz - width_hz / 2, hz + width_hz / 2))
                for hz, width_hz, db in hums)
    rumble = unit_rms(band(rng.standard_normal((2, N)), 25, 110))
    rumble *= from_db(rumble_db + 3.5 * drift(9.3) + [[3], [-3]])
    return from_db(room_db + drift(12)) * (tone + fan + drone) + rumble


def ports(x, balance):
    """Each port passes its own share of every band."""
    power_ratio = from_db(at_bins(balance)) ** 2
    share_db = 10 * np.log10([4 * power_ratio / (1 + power_ratio), 4 / (1 + power_ratio)])
    return np.array([colour(x[k], share_db[k]) for k in (0, 1)])


def scene():
    """Near sounds with their echo, the background and the bumps, at the two ports."""
    # port balance, near sounds: (frequency [Hz], left re right [dB])
    near_balance = [(60, 3.5), (140, 0), (330, 1), (800, 8.5), (1200, 12), (2700, 18.5), (4000, 23),
                    (7000, 27), (9000, 19.5), (10700, 5.5), (12200, -2.5), (14000, -9.5), (16000, -8.5)]
    # port balance, background: (frequency [Hz], left re right [dB])
    far_balance = [(60, 7), (92, 6), (140, -0.5), (210, 6), (330, 5), (500, 2.5), (770, 4), (1170, 3.5),
                   (1790, 2.5), (2740, 4.5), (4190, 22.5), (6410, 6), (9810, 0), (15000, -4)]
    echo_db = -12.5
    near = paper_rustle() + drags_and_flap() + tip_slides()
    noise = port_noise()
    near += crease_snaps(noise) + edge_scrapes(noise[:, ::-1])
    near += knife_cuts() + hollow_taps() + cardboard_squeaks()
    near += from_db(echo_db) * room_echo(near)
    return ports(near, near_balance) + ports(background(), far_balance) + grip_bumps()


def record(dry):
    """Soft-clipped peaks, then a steep low-pass."""
    ceiling, cutoff_hz = .85, 15800
    low_pass = signal.ellip(12, .3, 70, cutoff_hz, fs=SR, output="sos")
    return signal.sosfilt(low_pass, ceiling * np.tanh(dry / ceiling))


dry = scene()
out = record(dry)
file_out(out)
```